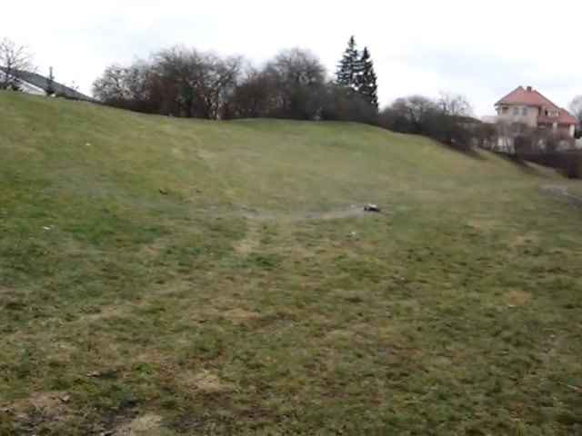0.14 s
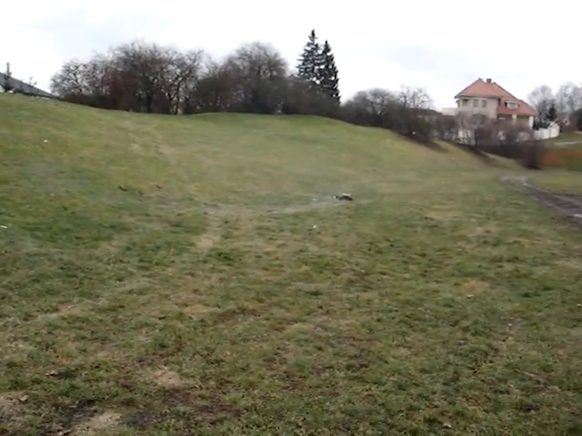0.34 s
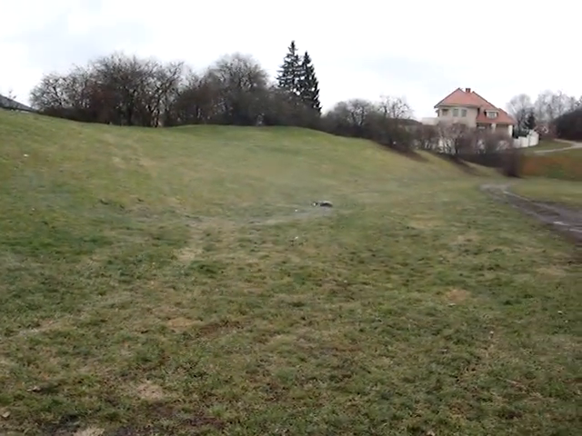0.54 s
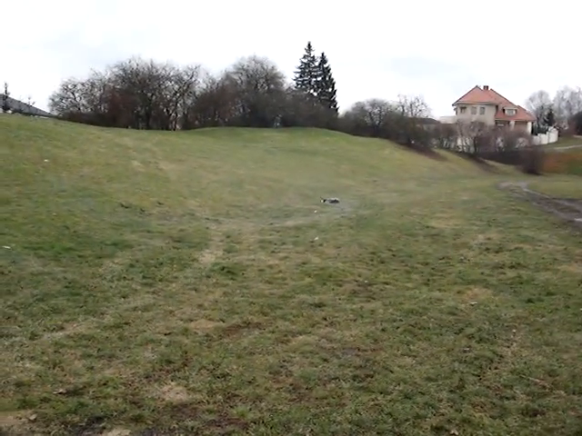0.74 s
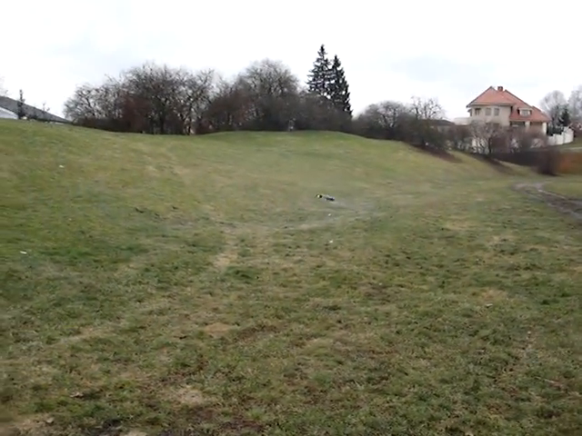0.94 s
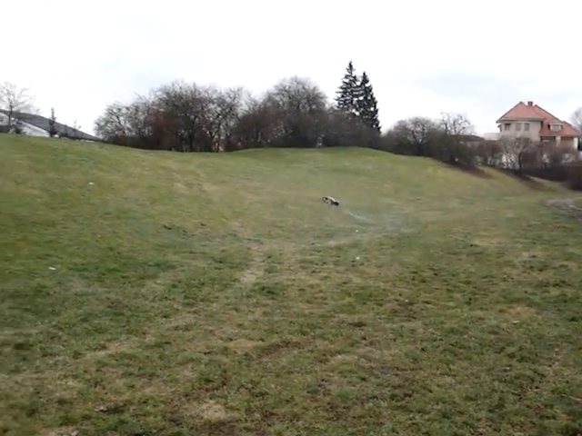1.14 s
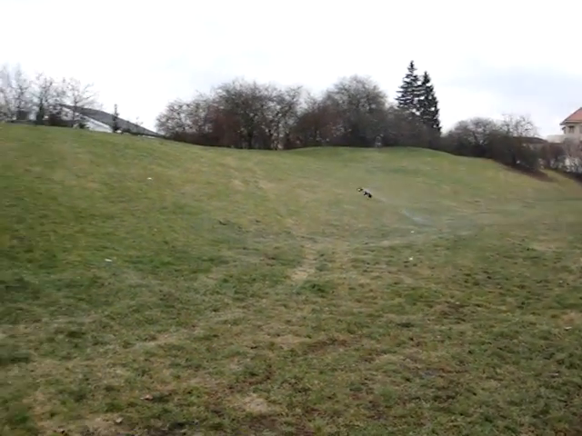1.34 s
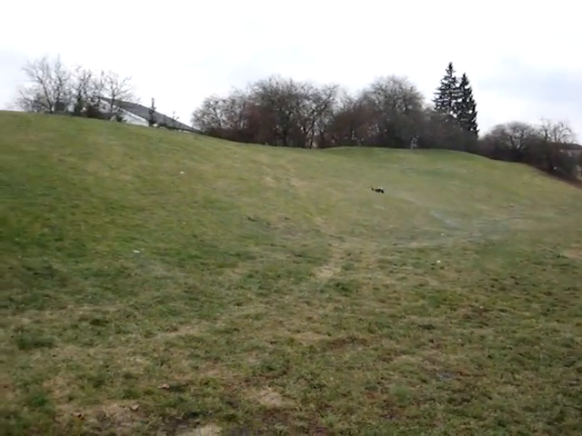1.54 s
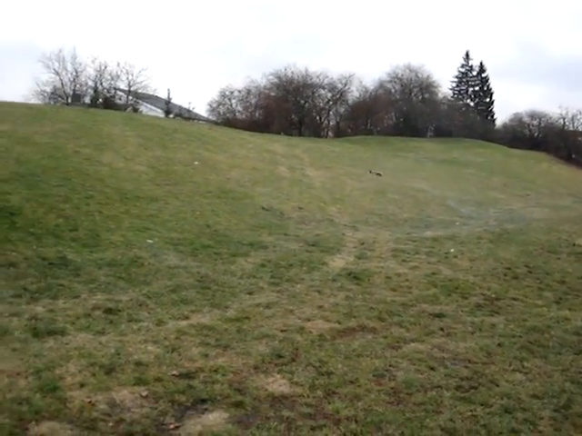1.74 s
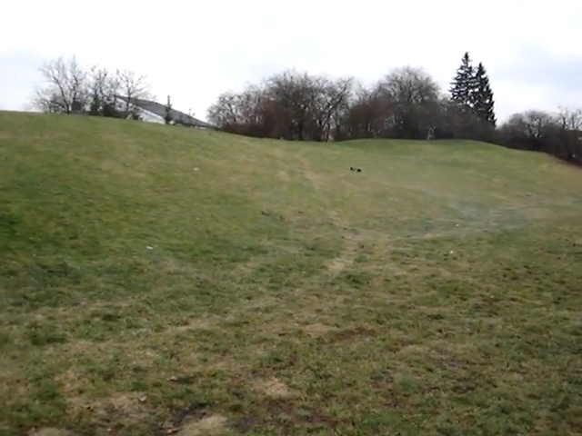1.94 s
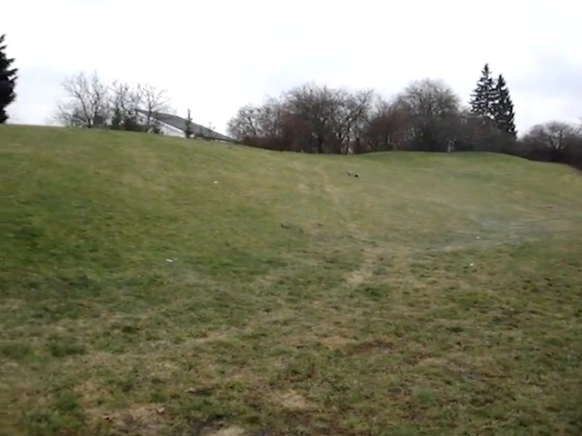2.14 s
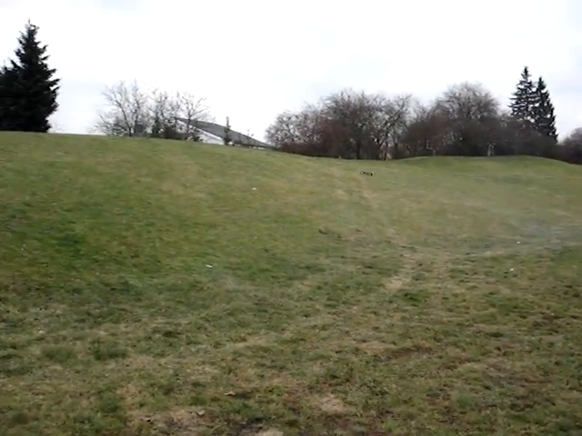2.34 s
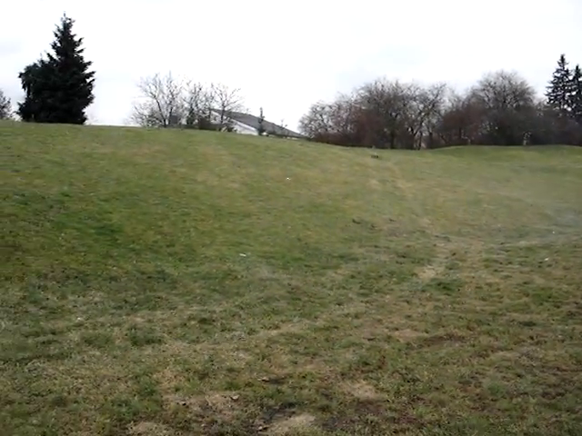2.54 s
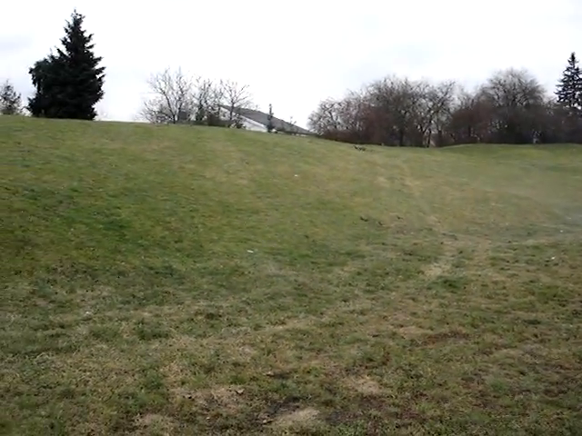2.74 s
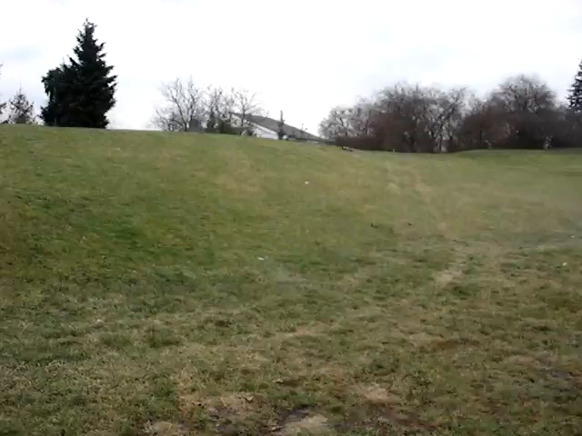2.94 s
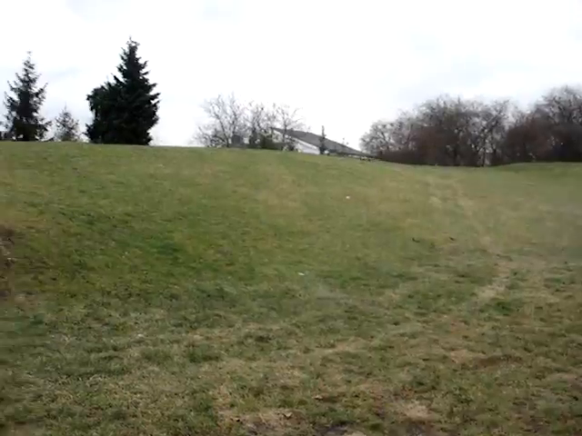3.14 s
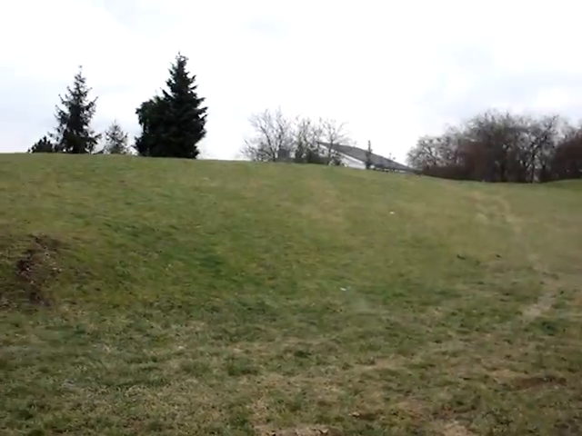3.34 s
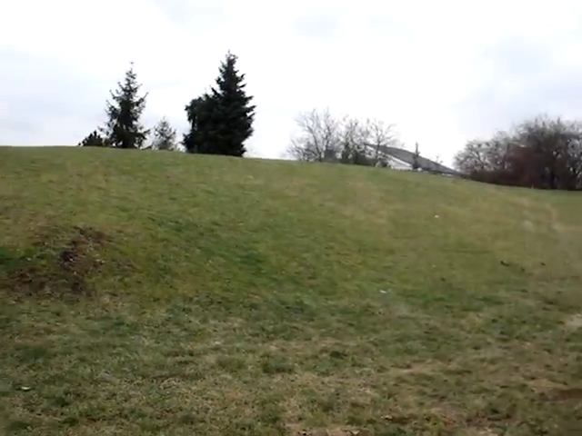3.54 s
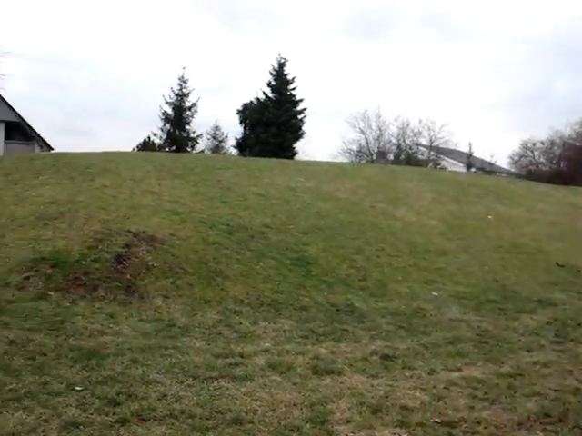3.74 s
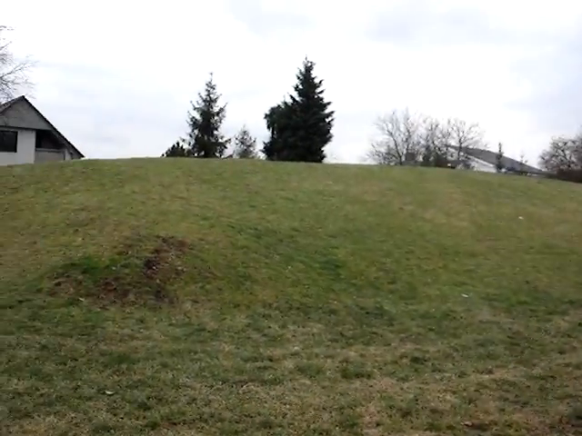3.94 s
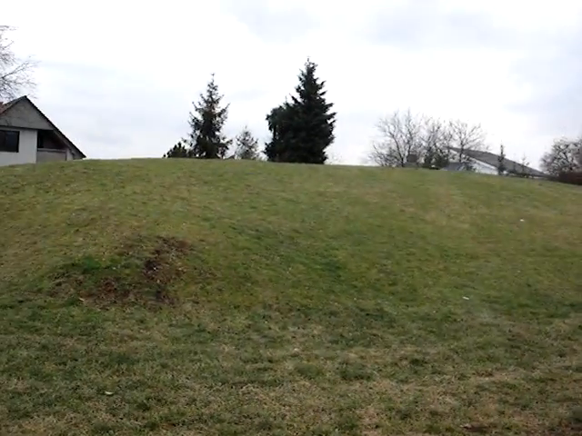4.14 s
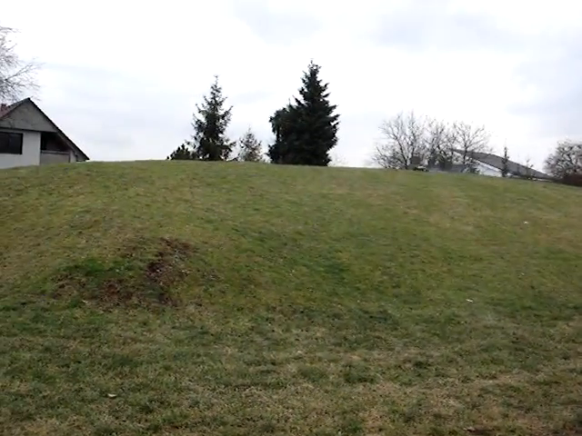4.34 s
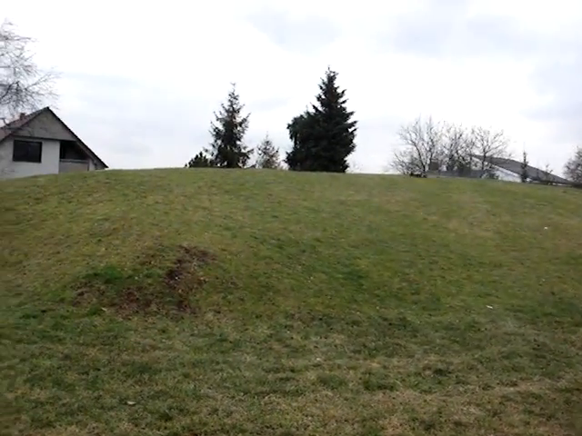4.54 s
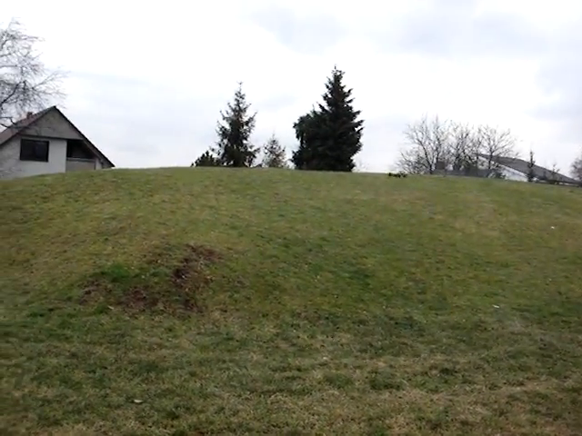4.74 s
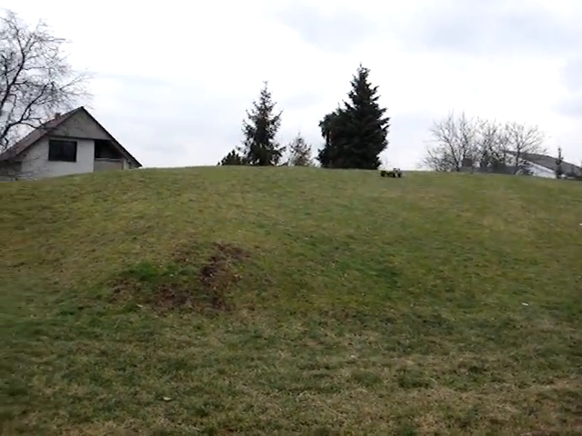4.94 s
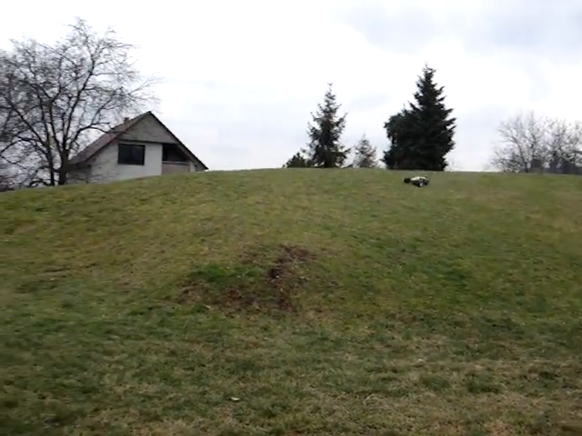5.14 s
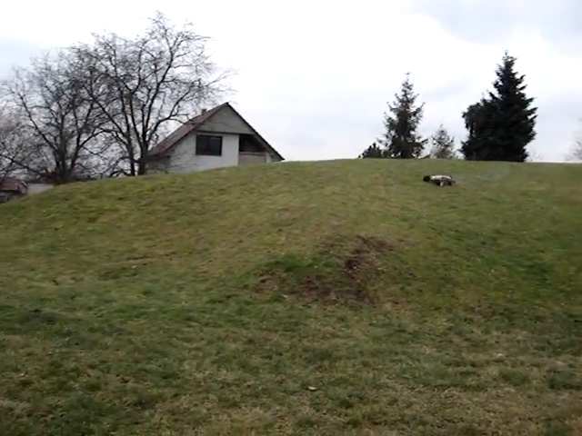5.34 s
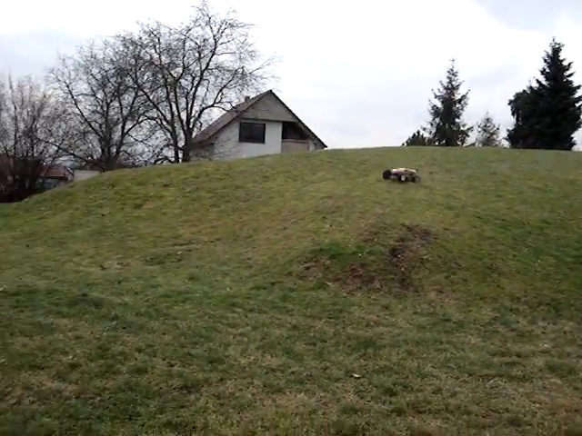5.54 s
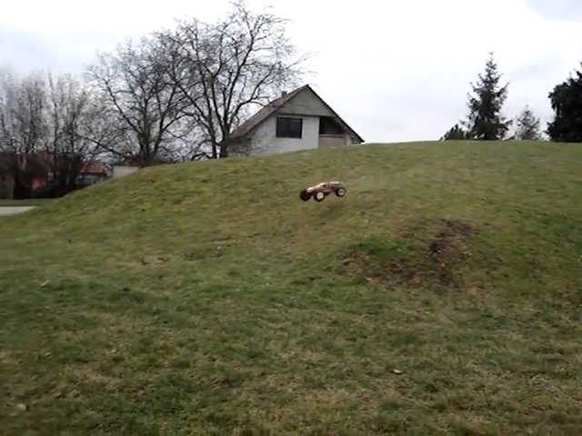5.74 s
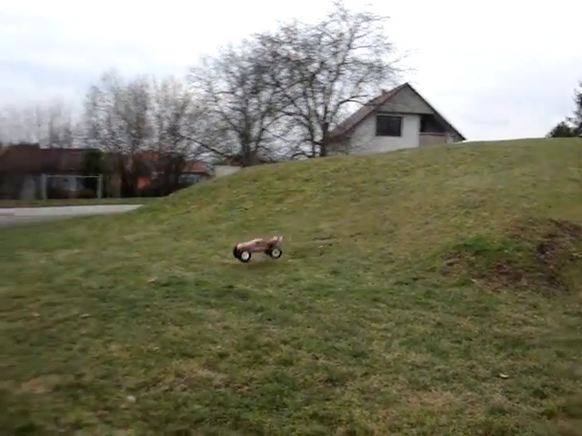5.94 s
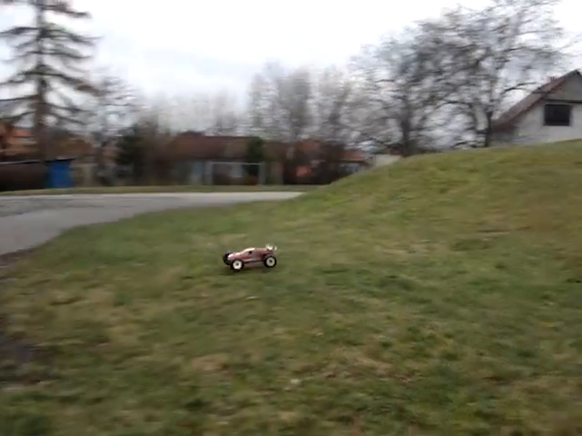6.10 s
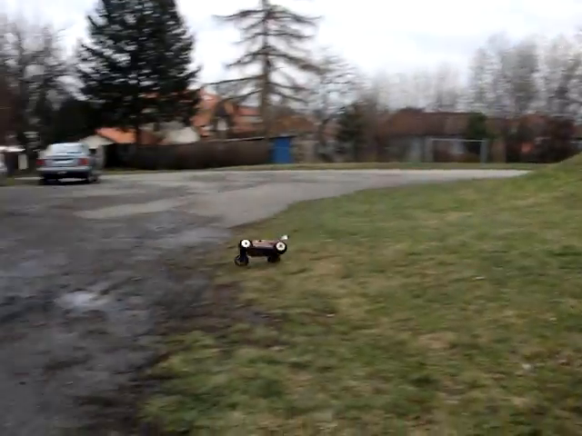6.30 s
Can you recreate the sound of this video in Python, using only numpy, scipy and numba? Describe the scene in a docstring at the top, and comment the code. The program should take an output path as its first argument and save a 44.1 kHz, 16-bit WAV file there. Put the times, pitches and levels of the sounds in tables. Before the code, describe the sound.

A small model truck's fuel engine buzzes and whines, revving up and down in quick bursts as it drives over grass.

```python
"""A nitro model truck drives away over a grassy hill, its throttle blipped (briefly opened) all the time.
Its tiny two-stroke engine fires once a turn and rings the tuned exhaust pipe; the gears sizzle in step
and the tyres drum on the turf. At 2.5 s there is a clack, then the truck races back, and at 4.4 s a gust
brushes the microphone. Near 6 s the tyres go quiet in a jump, and a thud follows.
All of it is heard through a mono pocket camera that weakens the sound near 2 kHz."""
import sys
import numpy as np
from scipy import signal
from scipy.fft import rfft, irfft, next_fast_len
from scipy.io import wavfile
from scipy.ndimage import uniform_filter1d
from numba import njit

SR = 44100
rng = np.random.default_rng(int(sys.argv[2]) if len(sys.argv) > 2 else 0)


def store_pcm(level_fs):
    """Save levels as 16-bit WAV."""
    pcm = np.round(np.clip(level_fs, -1, 1) * 32767).astype(np.int16)
    wavfile.write(sys.argv[1], SR, np.atleast_2d(pcm).T)


N = 280917
T = np.arange(N) / SR

# throttle blips and wheel spins: (opens [s], firing rate then [Hz], closes [s], rate reached [Hz],
# spin-up time constant [s], extra tone and honk [dB], extra rasp and treble [dB])
BLIPS = [(0.0, 420.6, 0.2, 432.7, 0.406, 4.5, 1), (0.53, 254.4, 0.67, 364.6, 0.4946, 2.3, 0.6),
         (0.73, 341.9, 0.87, 395.2, 0.07, -4, -0.2), (0.95, 335.9, 1.05, 372.0, 0.413, 1, 2.3),
         (1.17, 309.5, 1.32, 455.8, 0.4, -1.5, -0.3), (1.38, 428.3, 1.585, 463.3, 0.02, -6, 0.5),
         (1.62, 322.1, 1.655, 310.1, 0.3, -11, -0.5), (1.7, 226.7, 1.795, 278.8, 0.305, 1.3, -2.8),
         (1.81, 268.9, 1.9, 306.4, 0.29, 0.6, 0.7), (1.93, 298.5, 2.055, 340.1, 0.03, -1.5, 0.5),
         (2.1, 298.6, 2.27, 406.7, 0.08, 0.5, 0.8), (2.47, 228.2, 2.64, 316.2, 0.05, 0.1, 1.5),
         (2.74, 223.7, 2.83, 309.9, 0.487, 0.5, 1.3), (3.17, 317.1, 3.27, 408.5, 0.453, -0.3, 1),
         (3.35, 324.8, 3.55, 347.1, 0.283, 0.6, 0), (3.57, 342.7, 3.67, 388.8, 0.04, -0.3, -0.6),
         (3.7, 354.3, 3.9, 431.1, 0.23, -1, 1.0), (3.94, 389.5, 4.11, 496.2, 0.595, -1, 1.0),
         (4.17, 449, 4.26, 461.8, 0.0199, 1.3, -0.5), (4.28, 383.1, 4.42, 538, 0.36, 0, -0.1),
         (4.5, 454.1, 4.62, 545.3, 0.516, -3, -1.8), (4.68, 418.3, 4.85, 475.5, 0.02, -7, -1),
         (4.88, 372.4, 4.91, 399.4, 0.23, 2, -0.7), (4.925, 367.2, 5.12, 557, 0.22, -0.5, 0.6),
         (5.23, 440.1, 5.37, 531.4, 0.14, 2.1, 1.5), (5.45, 451.7, 5.63, 553, 0.5, 0.8, -0.3),
         (5.78, 540.3, 5.93, 613.7, 0.13, 4.5, 1.3), (5.98, 585, 6.08, 587.2, 0.22, -4.5, 2.6),
         (6.12, 362.2, 6.165, 414.8, 0.3, -0.5, 2.5), (6.175, 301, 6.24, 445, 0.297, 0.5, -1),
         (6.25, 335, 6.315, 469.7, 0.3, 0, -0.3), (6.325, 391.6, 6.37, 474, 0.27, 1.5, -0.5)]
# the firing tone, before speed and throttle change its level: (time [s], level [dB])
TONE_LEVEL = [(0.0, -53), (0.52, -39), (0.94, -35.5), (1.64, -46.0), (1.99, -31.5), (2.34, -39.0),
              (2.55, -27), (2.69, -38), (2.76, -30.5), (3.6, -36), (4.51, -30), (4.58, -25.5), (4.86, -44),
              (5.07, -35.0), (5.28, -41), (5.7, -30.5), (5.98, -41), (6.05, -36.5), (6.19, -54),
              (6.37, -40)]
# the pipe's honk, likewise: (time [s], level [dB])
HONK_LEVEL = [(0.0, -36), (0.24, -44.5), (0.52, -26.5), (0.66, -38.5), (0.73, -32.5), (1.08, -35),
              (1.15, -29), (1.29, -39), (1.99, -25.5), (2.34, -28.5), (2.48, -21), (2.55, -25), (4.65, -27),
              (4.93, -28.5), (5.07, -33.5), (6.05, -39), (6.12, -30.5), (6.37, -41.5)]
# the high sounds, likewise; low far up the hill: (time [s], rasp [dB], ring [dB], sizzle [dB])
TREBLE_LEVEL = [(0.0, -32, -24.5, -26.5), (0.24, -30, -27, -28), (0.59, -27.5, -15, -23.5),
                (0.66, -28, -22, -23.5), (1.01, -33.5, -23.5, -27.5), (1.15, -27.0, -16, -22.5),
                (1.29, -24.5, -19, -32.5), (1.57, -34.5, -27, -33.5), (1.64, -32, -30, -33),
                (2.13, -34, -22, -30.5), (2.41, -34, -31.5, -35.5), (2.62, -37.5, -25.5, -37),
                (2.69, -35.5, -30.5, -45), (2.9, -40, -25.5, -32.5), (3.74, -37, -35.0, -44),
                (4.44, -33, -23.5, -28), (4.93, -26.0, -22.5, -24), (5.07, -29.5, -23.5, -29),
                (5.63, -25.0, -23.5, -29.0), (6.12, -33, -27.5, -31), (6.19, -24.5, -18.5, -25.5),
                (6.37, -24.5, -19.5, -25)]
# the pipe's main note moves with gas heat and the way the outlet points: (time [s], pitch [Hz])
PIPE_PITCH = [(0, 930), (.32, 1050), (.5, 824), (1.15, 890), (1.45, 1220), (1.55, 1030), (1.95, 1020),
              (2.2, 774), (2.5, 895), (2.77, 840), (2.9, 676), (3.55, 690), (4.08, 926), (5.5, 990),
              (5.65, 700), (5.85, 1130), (5.95, 870), (6.37, 1100)]
# how strongly the pipe's upper note is aimed at the microphone: (time [s], gain [dB])
PIPE_UPPER_GAIN = [(0, -8), (.3, -14), (.8, -5.5), (1.4, -1.5), (1.8, -8), (2.2, -7.5), (2.45, -17),
                   (2.75, -15.5), (3.1, -11.5), (3.6, -12), (4.1, -7.5), (4.6, -4.5), (5.3, -0.5),
                   (5.8, -13), (6.37, -6.5)]
# the note at which the outlet whistles: (time [s], pitch [Hz])
WHISTLE_PITCH = [(0, 2730), (.42, 3060), (.75, 2360), (1.38, 2370), (1.6, 2950), (1.9, 2200), (2.5, 2950),
                 (3.1, 2230), (3.7, 2320), (4.15, 2490), (4.45, 2970), (4.82, 3280), (4.92, 2600),
                 (5.1, 3150), (5.48, 2870), (5.58, 3260), (5.77, 3330), (5.81, 2330), (6.37, 2950)]
# tone colour of the exhaust's rasp: (frequency [Hz], gain [dB])
RASP_COLOUR = [(1000, -49), (1500, -4.5), (1850, -6), (2250, 2), (2700, -6), (3200, 1), (3600, -6),
               (4200, 0.5), (5000, -11), (7000, -30), (10000, -39)]
# the truck's motion towards the microphone: (time [s], speed [m/s])
APPROACH_SPEED = [(0, -6), (.7, -0.5), (2.1, 1), (2.9, -6.5), (3.5, 12), (4.3, 14), (5.4, 13.5), (5.9, 3),
                  (6.37, 8)]
# how the metal parts ring when the truck stands still: (pitch [Hz], width [Hz], gain [dB])
METAL_RINGS = [(5227, 246, -3.5), (6240, 460, -20), (7660, 107, -4), (9060, 118, -6.5)]
# tone colour of the gears' hiss: (frequency [Hz], gain [dB])
GEAR_COLOUR = [(2000, -43), (3500, -27), (4500, -22), (5600, -17), (7100, -19), (8400, -12), (9300, -19.5),
               (10200, -30.5)]
# the outlet's upper note, which colours the engine's scream: (time [s], pitch [Hz])
SCREAM_PITCH = [(0, 5200), (1.2, 5300), (2.4, 5130), (2.9, 5500), (4.7, 5340), (5.0, 5650), (5.36, 6200),
                (5.43, 5480), (5.6, 6400), (5.87, 6450), (6.02, 4750), (6.15, 5500), (6.37, 5300)]
# tone colour of the scream: (frequency [Hz], gain [dB])
SCREAM_COLOUR = [(2500, -38.5), (3800, -11.5), (4600, -1.5), (5400, -5.5), (6500, 1.5), (7200, -4),
                 (8100, 5), (9000, -16), (10200, -21.5)]
# how much of the treble is gear rattle: (time [s], share [0-1])
RATTLE_SHARE = [(0, 1), (1.1, .75), (1.55, 0.74), (2.4, 0.8), (4.2, .87), (4.8, .33), (4.92, .52),
                (5.3, .35), (6.0, .33), (6.1, .7), (6.37, .55)]
# tyres and chassis on the turf, almost silent in the jump: (time [s], level [dB])
TURF_LEVEL = [(0, -51), (.25, -46), (1.05, -45.5), (1.45, -51.5), (1.8, -42), (2.75, -34.5), (3.3, -32.5),
              (4.2, -37), (4.9, -40.5), (5.1, -51), (5.87, -50.5), (6.0, -70), (6.08, -52), (6.37, -47.5)]
# tone colour of that drumming: (frequency [Hz], gain [dB])
TURF_COLOUR = [(25, -21), (60, -14.5), (105, -3), (155, -6.5), (210, -1), (400, -3), (520, -7), (780, 5.5),
               (1100, -4), (1500, -7.5), (4000, -28)]
# clack and thud: (time [s], gain [dB], low edge [Hz], high edge [Hz], rattle [dB], rattle decay [s])
KNOCKS = [(2.4780, -3, 650, 2040, -39, 0.005), (6.082, -23.5, 455, 1396, -13, 0.017)]
# wind hitting the microphone: (time [s], level [dB], decay [s])
GUSTS = [(4.374, -33, 0.081), (4.47, -48, .04), (4.68, -45, .04), (4.92, -48, 0.041)]

COAST_S, THROTTLE_S = .092, .017  # time constant of the slowing engine; travel time of the throttle
CRUISE_HZ, LOUDER_DB_PER_OCTAVE = 392, 7.5  # a faster engine is louder; an octave doubles the speed
SETTLE_S = .04993  # time the mixture of fuel and air takes to settle
ROUGH_STEADY, ROUGH_FALLING, ROUGH_RISING = .39, 1.595, 1.3  # uneven burn; extra per octave lost, gained
BOUNCE_SHARE, BOUNCE_PER_S = .008, 32  # bouncing wheels make the engine speed waver
CHOKE_DB_PER_OCTAVE, UNLOAD_DB_PER_OCTAVE = 8, 6.5  # what exhaust and treble lose in a sudden slowdown
NOTCH_HZ, NOTCH_WIDTH_HZ, TOP_HZ = 1983, 310, 10100


def undb(db):
    """Turn decibels into a factor to multiply by."""
    return 10 ** (np.asarray(db) / 20)


def curves(table):
    """Each column of a table, joined by straight lines in time."""
    times, *columns = np.transpose(table)
    return [np.interp(T, times, column) for column in columns]


def noise():
    """White noise: an even hiss."""
    return rng.standard_normal(N)


def wander(per_s):
    """A random curve, about 1 in size, that heads for a new value per_s times a second."""
    targets = rng.standard_normal(4096)
    return 1.2 * np.interp(T * per_s, np.arange(len(targets)), targets)


def steady(x, size=1500):
    """Hold the level near 1, averaging over size samples."""
    power = uniform_filter1d(uniform_filter1d(x * x, size), size)
    return x / np.sqrt(np.abs(power) + 1e-14)


def colour(x, points):
    """Boost or weaken each frequency as the table of points says."""
    hz, db = np.transpose(points)
    size = next_fast_len(N + 4096, real=True)
    freqs = np.maximum(np.fft.rfftfreq(size, 1 / SR), 1)
    gain = undb(np.interp(np.log(freqs), np.log(hz), db))
    # folding the cepstrum makes the filter ring only after a sound, never before it
    cepstrum = irfft(np.log(gain), size)
    cepstrum[1:size // 2] *= 2
    cepstrum[size // 2 + 1:] = 0
    return irfft(rfft(x, size) * np.exp(rfft(cepstrum)), size)[:N]


@njit
def moving_band(x, hz, width):
    """Let through one band of frequencies, whose centre and width may move."""
    out, band_state, low_state = np.empty(len(x)), 0., 0.
    for i in range(len(x)):
        step, damping = np.tan(np.pi * hz[i] / SR), width[i] / hz[i]
        band = (band_state + step * (x[i] + 1e-18 - low_state)) / (1 + step * (step + damping))
        band_state = 2 * band - band_state
        low_state += 2 * step * band
        out[i] = damping * band
    return out


def ring(x, hz, width_hz):
    """Make a sound ring at one pitch; a narrower width rings longer."""
    return moving_band(x, hz + np.zeros(N), width_hz + np.zeros(N))


def keep(x, hz, side, order=4):
    """Keep what lies on the "high" or the "low" side of hz."""
    return signal.sosfilt(signal.butter(order, hz, side, fs=SR, output="sos"), x)


def clicks(times, sizes, reach=6):
    """Clean clicks at the given times, even between two samples."""
    at = np.clip(times * SR, reach, N - reach - 1)[:, None]
    taps = at.astype(int) + np.arange(1 - reach, reach + 1)
    shape = np.sinc(taps - at) * np.cos(np.pi / 2 * (taps - at) / reach) ** 2
    return np.bincount(taps.ravel(), (sizes[:, None] * shape).ravel(), N)


def burst(start_s, decay_s):
    """Noise that starts at once and dies away."""
    return noise() * (T >= start_s) * np.exp(-np.abs(T - start_s) / decay_s)


def engine_speed():
    """Firings per second: each blip spins the engine up, then it coasts until the next one."""
    def ease(start, end, time_constant):
        elapsed = np.clip(T - start, 0, end - start)
        return np.expm1(-elapsed / time_constant) / np.expm1((start - end) / time_constant)

    hz = np.full(N, float(BLIPS[0][1]))
    for opens, start_hz, closes, top_hz, spin_s, *_ in BLIPS:
        hz += (top_hz - start_hz) * ease(opens, closes, spin_s)
    for (_, _, closes, top_hz, *_), (reopens, next_hz, *_) in zip(BLIPS, BLIPS[1:]):
        hz += (next_hz - top_hz) * ease(closes, reopens, COAST_S)
    return hz


def speed_change(hz):
    """Octaves of speed just lost and just gained: the mixture needs a moment to settle after either."""
    octaves = np.log2(hz / hz[0])
    memory = np.exp(-1 / (SETTLE_S * SR))
    change = octaves - signal.lfilter([1 - memory], [1, -memory], octaves)
    return np.maximum(-change, 0), np.maximum(change, 0)


def firings(hz, rough, jitter_s=.00003, scatter_db=2.5, stumble=.11):
    """One pulse a turn and the gas puff after it; rough scales how much timing and strength vary."""
    turns = np.cumsum(hz) / SR
    number = np.arange(1, int(turns[-1]))
    times = np.interp(number, turns, T)
    uneven = np.interp(times, T, rough)
    late, strong, slip = rng.standard_normal((len(number), 3)).T
    # a fuel-rich mixture makes about every third firing stronger
    pattern = 1 + stumble * uneven * np.cos(2 * np.pi * number / 3 + np.cumsum(.405 * slip))
    sizes = pattern * undb(scatter_db * uneven * strong)
    pulses = clicks(times + jitter_s * uneven * late, sizes)
    puff = np.interp(np.floor(turns), number, sizes) * (np.exp(-(turns % 1) / .5) + 1)
    return steady(pulses), steady(puff)


def effort(hz):
    """Gains for exhaust and treble: both follow the speed, and each blip pushes them differently."""
    push_db = np.zeros((2, N))
    for opens, _, closes, _, _, exhaust_db, treble_db in BLIPS:
        push_db[:, (T >= opens) & (T < closes)] = [[exhaust_db], [treble_db]]
    speed_db = LOUDER_DB_PER_OCTAVE * np.log2(hz / CRUISE_HZ)
    return undb(speed_db + uniform_filter1d(push_db, int(THROTTLE_S * SR)))


def ground_echoes(x, share, flutter_hz=13, max_samples=170, count=4):
    """Echoes off uneven ground come and go as the truck bounces, so overtones swell and fade."""
    delays = rng.integers(max_samples // 8, max_samples, count)
    return x + share * sum(wander(flutter_hz) * np.roll(x, delay) for delay in delays)


def exhaust(hz, pulses, puff, rough):
    """Gas pulses make the firing tone and the pipe's honk and, returned apart, the outlet's rasp."""
    tone_db, = curves(TONE_LEVEL)
    honk_db, = curves(HONK_LEVEL)
    rasp_db, _, _ = curves(TREBLE_LEVEL)
    pipe_hz, = curves(PIPE_PITCH)
    upper_db, = curves(PIPE_UPPER_GAIN)
    whistle_hz, = curves(WHISTLE_PITCH)
    gas = pulses + .65 * rough * puff * noise()
    tone = ring(ring(gas, hz, 190), hz, 200)
    echoed = ground_echoes(gas, share=.36)
    main = keep(keep(ring(echoed, pipe_hz, 200), 580, "high"), 1625, "low")
    upper = ring(ring(echoed, 1562, 410), 1562, 410)
    honk = main + undb(upper_db) * upper
    jet = ground_echoes(pulses, share=.69) + 1.4 * rough * puff * noise()
    # the cleaner the burn, the more the outlet whistles
    whistle = 12 * np.clip(1 - rough, 0, 1) ** 3 * ring(jet, whistle_hz, 340)
    rasp = colour(jet + whistle, RASP_COLOUR)
    return steady(tone) * undb(tone_db) + steady(honk) * undb(honk_db), steady(rasp) * undb(rasp_db)


def scream(pulses, puff):
    """The engine's high overtones, strengthened around the outlet's upper note."""
    scream_hz, = curves(SCREAM_PITCH)
    jet = ground_echoes(pulses, share=.8, flutter_hz=21.98) + .28 * puff * noise()
    return steady(colour(jet + 4 * ring(jet, scream_hz, 380), SCREAM_COLOUR))


def gears(pulses, puff):
    """Each firing jolts the gear teeth, which hiss and ring the metal parts."""
    approach, = curves(APPROACH_SPEED)
    doppler = 1 / (1 - approach / 343)  # the ringing is higher while the truck drives towards us
    jolts = .17 * pulses * undb(4.3 * wander(300))
    metal = sum(undb(db + 4.4 * wander(30)) * ring(jolts + puff * noise(), hz * doppler, width)
                for hz, width, db in METAL_RINGS)
    hiss = colour(puff * noise() * undb(2.9 * wander(230)), GEAR_COLOUR)
    echoed = ground_echoes(hiss, share=.47, flutter_hz=17, max_samples=32, count=3)
    return steady(echoed + metal, size=3000)


def treble(pulses, puff):
    """The scream mixes with the gear rattle; both shake as the chassis bounces."""
    _, ring_db, sizzle_db = curves(TREBLE_LEVEL)
    share, = curves(RATTLE_SHARE)
    mix = np.sqrt(1 - share) * scream(pulses, puff) + np.sqrt(share) * gears(pulses, puff)
    ringing = steady(keep(mix, 6000, "low", order=6))
    sizzle = steady(keep(keep(mix, 6900, "high", order=6), TOP_HZ, "low", order=10))
    return ringing * undb(ring_db + wander(22)) + sizzle * undb(sizzle_db + wander(36))


def tyres():
    """Wheels drum unevenly on the grass."""
    db, = curves(TURF_LEVEL)
    return steady(colour(noise(), TURF_COLOUR), size=6000) * undb(db + 2.6 * wander(25))


def knocks():
    """A sharp clack, later a duller thud: one blow each, followed by a short rattle."""
    out = np.zeros(N)
    for start_s, db, low_hz, high_hz, rattle_db, decay_s in KNOCKS:
        blow = clicks(np.array([start_s]), np.ones(1)) + undb(rattle_db) * burst(start_s, decay_s)
        body = keep(keep(blow, low_hz, "high", order=2), high_hz, "low", order=7)
        out += undb(db) * SR / (2 * high_hz) * body
    return out


def wind(top_hz=36, breeze_db=-71):
    """A few gusts rumble on the microphone, over a very faint breeze."""
    breeze = noise() * undb(breeze_db + 4 * wander(5.5))
    gusts = sum(undb(db) * burst(start_s, decay_s) for start_s, db, decay_s in GUSTS)
    rumble = keep(breeze + gusts, top_hz, "low", order=2)
    return rumble * np.sqrt(SR / 2 / top_hz)  # makes up the level lost in the filter


def scene():
    """The engine drives exhaust and gears; an unsettled mixture burns unevenly, a rich one weakly."""
    speed = engine_speed()
    lost, gained = speed_change(speed)
    rough = np.clip(ROUGH_STEADY + ROUGH_FALLING * lost + ROUGH_RISING * gained, 0, .8)
    hz = speed * (1 + rough * (.016 * wander(70) + BOUNCE_SHARE * wander(BOUNCE_PER_S)))
    pulses, puff = firings(hz, rough)
    exhaust_gain, treble_gain = effort(speed)
    pipe, rasp = exhaust(hz, pulses, puff, rough)
    buzz = undb(-CHOKE_DB_PER_OCTAVE * lost) * (exhaust_gain * pipe + treble_gain * rasp)
    whine = undb(-UNLOAD_DB_PER_OCTAVE * lost) * treble_gain * treble(pulses, puff)
    return np.tile(buzz + whine + tyres() + knocks() + wind(), (2, 1))


def record(dry):
    """The camera weakens a narrow band near 2 kHz and cuts off the highest treble."""
    notched = signal.lfilter(*signal.iirnotch(NOTCH_HZ, NOTCH_HZ / NOTCH_WIDTH_HZ, fs=SR), dry)
    heard = dry + 1.18 * (notched - dry)
    return signal.sosfilt(signal.ellip(10, .2, 80, TOP_HZ, fs=SR, output="sos"), heard)


dry = scene()
out = record(dry)
store_pcm(out)
```